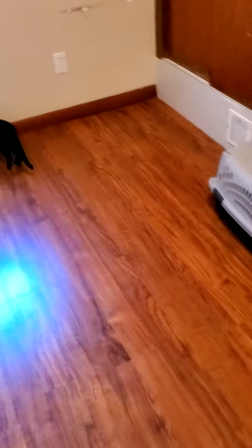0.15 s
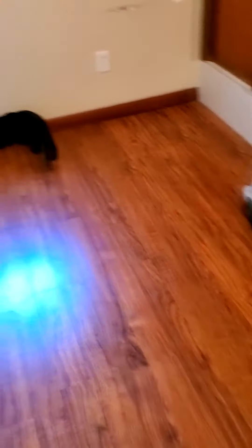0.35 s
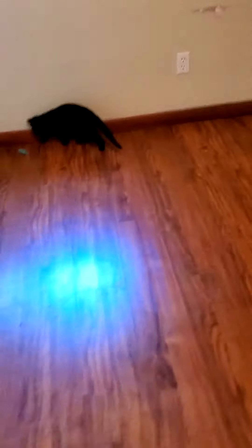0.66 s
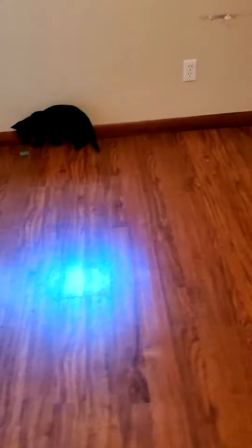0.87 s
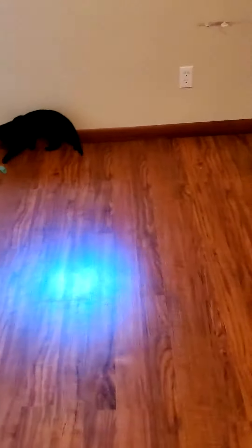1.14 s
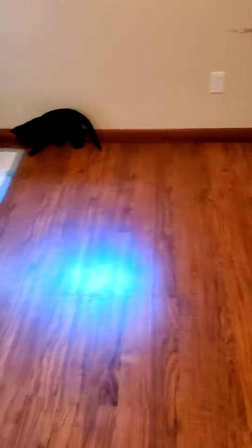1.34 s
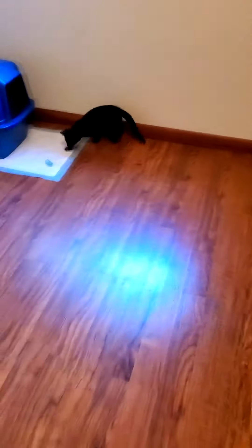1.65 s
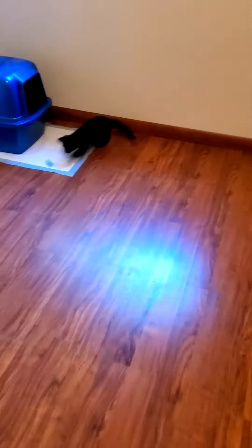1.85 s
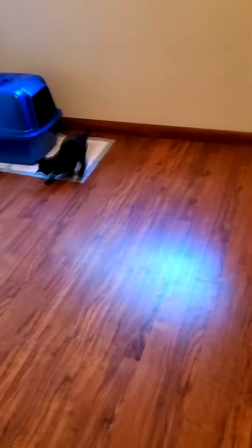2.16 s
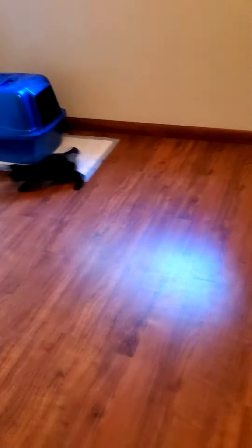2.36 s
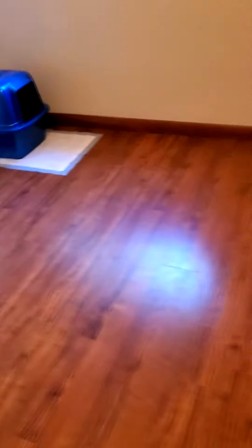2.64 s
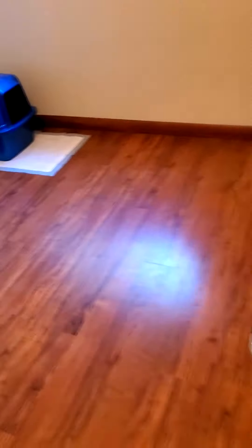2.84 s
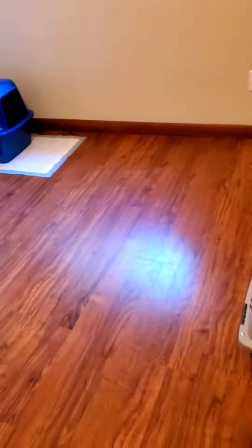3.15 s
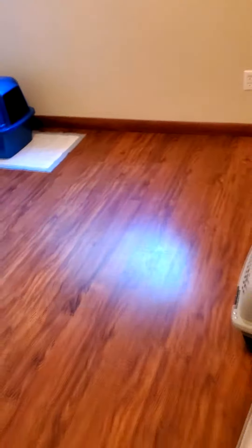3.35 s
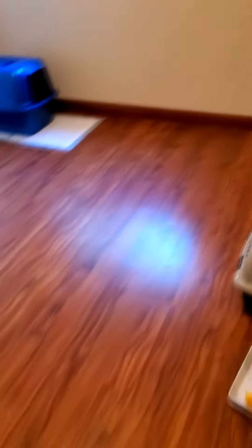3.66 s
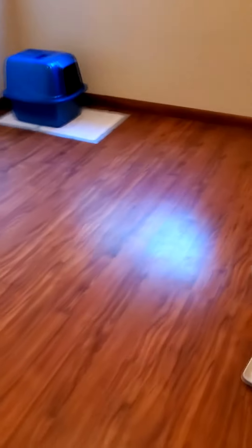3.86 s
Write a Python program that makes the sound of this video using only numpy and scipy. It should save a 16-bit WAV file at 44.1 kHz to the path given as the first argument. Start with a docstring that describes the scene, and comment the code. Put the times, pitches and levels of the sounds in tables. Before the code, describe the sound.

Toy skidding and knocking on wooden boards, with scratching claws and soft paw thuds, in an echoing room

```python
"""A bare, echoing room with a hard wooden floor: a cat chases a light toy over the boards. The toy skids and
the claws scratch (random contacts, filtered); toy and paws knock the boards (noise bursts and decaying modes,
with echo). Bright ticks, short narrow ringing bands, steady room tone and faint hum lie around them. The hand-
held camera swings round, so air buffets its two microphone ports (low noise, apart in each port)."""
import sys
import numpy as np
from scipy import signal
from scipy.fft import rfft, irfft, next_fast_len
from scipy.io import wavfile
from scipy.ndimage import uniform_filter1d, map_coordinates

SR = 44100
rng = np.random.default_rng(int(sys.argv[2]) if len(sys.argv) > 2 else 0)


def digitize_waveform(pressure):
    """Quantize a signal to 16-bit integers and store it at the path in sys.argv[1].

    Rows of a 2-D input are taken as channels; values are limited to [-1, 1].
    """
    field = np.atleast_2d(pressure).T
    bounded = np.clip(field, -1, 1)
    quanta = np.round(bounded * 32767).astype(np.int16)
    wavfile.write(sys.argv[1], SR, quanta)


def gain_from_decibels(decibels):
    """Convert decibel values to linear amplitude factors."""
    exponent = np.asarray(decibels, float) / 20
    return 10 ** exponent


N = 176400


def unit(x):
    """x at rms 1."""
    return x / np.sqrt(np.mean(x ** 2) + 1e-20)


def along(points, hz):
    """Interpolates (frequency [Hz], value) points on a log frequency axis."""
    f, v = np.transpose(points)
    return np.interp(np.log(hz + 1), np.log(f + 1), v)


def curves(rows):
    """One value per sample for each column after the time."""
    time_s, *columns = np.transpose(rows)
    return [np.interp(np.arange(N) / SR, time_s, c) for c in columns]


def wobble(knots_per_s):
    """A smooth random curve through normal-distributed knots."""
    return map_coordinates(rng.standard_normal(200), [np.arange(N) * knots_per_s / SR])


def filtered(x, response):
    """x times a response of frequency."""
    m = next_fast_len(x.shape[-1] + 4096)
    spectrum = rfft(x, m) * response(np.fft.rfftfreq(m, 1 / SR))
    return irfft(spectrum, m)[..., :x.shape[-1]]


def grains(size, per_s, spread_db):
    """Irregular contacts of uneven strength, rms 1."""
    hit = rng.random(size) < per_s / SR
    strength = rng.standard_normal(size) * gain_from_decibels(spread_db * rng.exponential(size=size))
    return unit(hit * strength)


def add(out, time_s, x):
    """Mixes x into out from time_s, cut at the end of out."""
    part = out[:, round(time_s * SR):][:, :x.shape[1]]
    part += x[:, :part.shape[1]]


# left-right likeness of the diffuse field: (frequency [Hz], correlation [0..1])
FIELD_LIKENESS = [(100, 1), (300, 0.89), (700, 0.17), (1500, 0.033), (15000, 0.033)]


def paired(pair):
    """Two unrelated signals made as alike as a diffuse field at two close ports."""
    def mid_side_gain(hz):
        turn = np.arccos(np.clip(along(FIELD_LIKENESS, hz), -1, 1)) / 2
        return np.sqrt(.5) * np.array([np.cos(turn), np.sin(turn)])

    mid, side = filtered(pair, mid_side_gain) * np.sqrt(2)
    return np.array([mid + side, mid - side])


# echo decay before each source's scaling: (frequency [Hz], t60 [s])
ROOM_DECAY = [(150, 0.99), (500, 0.85), (2000, 0.53), (5000, 0.32), (14000, 0.1)]
PORT_LAG_SAMPLES = 7  # direct sound reaches the left port later
DIRECT_DB = -5  # direct sound against the echo, for knocks and squeaks


def room(x, direct_db, decay_scale=1):
    """Direct sound plus a fresh noise tail in which each frequency dies at its own speed."""
    hz, t, z = signal.stft(rng.standard_normal((2, SR // 2)), SR, nperseg=256)
    t60_s = decay_scale * along(ROOM_DECAY, hz)
    tail = paired(signal.istft(z * gain_from_decibels(-60 * t / t60_s[:, None]), SR, nperseg=256)[1])
    tail = np.pad(tail / np.linalg.norm(tail[0]), ((0, 0), (120, 0)))
    tail[0, PORT_LAG_SAMPLES] = tail[1, 0] = gain_from_decibels(direct_db)
    return signal.fftconvolve(x[None], tail, axes=1)


def steady(wet, dry):
    """The echoed sound with the energy of the dry one in each channel, on average."""
    return wet * np.linalg.norm(dry) / np.linalg.norm(wet) * np.sqrt(2)


# room tone spectrum: (frequency [Hz], relative level [dB])
HUSH_SPECTRUM = [(59, -38), (100, -6.5), (149, 1.5), (276, -5.5), (440, -5), (510, -7), (579, -6),
                 (671, -12), (865, -14), (1560, -23), (6880, -26.5), (8500, -37.5), (15700, -33)]
HUSH_DB, DRIFT_DB, DRIFT_KNOTS_PER_S = -47, 1.2, 3.42


def hush():
    """Steady room tone: shaped diffuse noise whose level drifts a little."""
    noise = paired(rng.standard_normal((2, N)))
    tone = unit(filtered(noise, lambda hz: gain_from_decibels(along(HUSH_SPECTRUM, hz))))
    return gain_from_decibels(HUSH_DB + DRIFT_DB * wobble(DRIFT_KNOTS_PER_S)) * tone


# faint tones: (frequency [Hz], relative level [dB])
HUM_TONES = [(360.7, -61), (446.8, -58)]


def hum():
    """Sines wavering in level and phase, alike in both channels."""
    out, t = np.zeros(N), np.arange(N) / SR
    for hz, level_db in HUM_TONES:
        gain = gain_from_decibels(level_db + 1 + 4.5 * wobble(5.45))
        out += gain * np.sin(2 * np.pi * hz * t + 1.7 * wobble(12))
    return out


def port_gains(left_over_right_db):
    """Left and right gains of the given ratio, summing to 2."""
    return 2 / (1 + gain_from_decibels(np.array([-left_over_right_db, left_over_right_db])))


# air on the ports: (time [s], level [dB], left over right [dB])
AIR_LEVELS = [(0.0, -20, -15), (0.08, -36, -2), (0.15, -36, -22.5), (0.18, -30, -26), (0.23, -33.5, 13),
              (0.33, -25, 8), (0.37, -38.5, 2), (0.52, -32.5, 6), (0.56, -31.5, -16), (0.59, -25.5, 17.0),
              (0.63, -22, 20.5), (0.68, -26, 1), (0.71, -26, 10), (0.86, -26, -7), (0.91, -29, 16.5),
              (0.95, -32, 7), (1.0, -29.5, -3), (1.1, -28.5, 12), (1.14, -42, -1), (1.16, -30, 20),
              (1.21, -34.5, -3), (1.26, -36, 15), (1.3, -31, -9), (1.4, -29.5, 16), (1.45, -34.5, 5),
              (1.5, -34.5, -4), (1.61, -28, -15), (1.65, -41.5, 13), (1.78, -54, -3), (1.84, -42, 15),
              (1.87, -57, 11), (1.96, -22.5, 27), (2.02, -51, 18), (2.06, -38, 29), (2.12, -48.5, 10),
              (2.27, -44.5, 2.5), (2.34, -37.5, 24), (2.52, -43.5, 10), (2.54, -36, 2), (2.72, -63, 9),
              (2.75, -60, 15), (3.39, -42, -1), (3.85, -56.5, 6), (4.0, -53, 10)]
# turbulence spectrum: (frequency [Hz], relative level [dB])
BUFFET_SPECTRUM = [(12, -54), (20, -32), (51, 2.5), (75, 2), (134, -11.5), (307, -33.5), (331, -19),
                   (400, -56.5), (520, -72), (880, -120)]
EVEN_S = 0.0486  # window over which turbulence strength is evened
LUMPS_DB, LUMPS_PER_S = 4, 16


def buffeting():
    """Lumpy low turbulence, unrelated between the ports."""
    level_db, pan_db = curves(AIR_LEVELS)
    rush = filtered(rng.standard_normal((2, N)), lambda hz: gain_from_decibels(along(BUFFET_SPECTRUM, hz)))
    local_power = np.abs(uniform_filter1d(rush ** 2, int(EVEN_S * SR), axis=1))
    rush = rush / np.sqrt(local_power + 0.28 * np.mean(rush ** 2))
    lumps = gain_from_decibels(LUMPS_DB * np.array([wobble(LUMPS_PER_S), wobble(LUMPS_PER_S)]))
    return port_gains(pan_db) * gain_from_decibels(level_db) * unit(rush * lumps)


# sharp puffs: (time [s], level [dB], left over right [dB], frequency [Hz], width [s])
PUFFS = [(.661, -17.5, 27, 167, 0.0012), (1.217, -20, 31, 165, 0.0017), (1.946, -31.5, 16, 109, 0.0037)]


def puffs():
    """Air puffs on the ports: short cosines under a Gaussian, centred one width after their time."""
    out, t = np.zeros((2, N)), np.arange(-SR // 50, SR // 50) / SR
    for time_s, level_db, pan_db, hz, width_s in PUFFS:
        puff = -np.cos(2 * np.pi * hz * t) * np.exp(-(t / width_s) ** 2 / 2)
        add(out, time_s + t[0] + width_s, gain_from_decibels(level_db) * port_gains(pan_db)[:, None] * puff)
    return out


# short narrow ringing bands: (time [s], level [dB], frequency [Hz], length [s], half width [Hz])
RINGING_BANDS = [(4.2, -18.5, 2230, 0.0061, 180), (3.34, -42, 2500, 0.054, 54), (2.848, -28, 2170, 0.0077, 150),
                 (2.972, -23, 1200, 0.011, 147)]
RING_DECAY_SCALE = 1.1


def ringing_bands():
    """Narrow noise bands that swell and fade, ringing out of the scuffle."""
    out, t = np.zeros((2, N)), np.arange(SR // 5) / SR
    for time_s, level_db, hz, length_s, width_hz in RINGING_BANDS:
        noise = rng.standard_normal(len(t))
        band = unit(filtered(noise, lambda f: 1 / (1 + ((f - hz) / width_hz) ** 2)))
        shape = t / length_s * np.exp(1 - t / length_s)
        add(out, time_s, gain_from_decibels(level_db) * steady(room(band * shape, DIRECT_DB, RING_DECAY_SCALE), shape))
    return out


# bright ticks of the toy's shell: (time [s], relative level [dB], centre [Hz])
SHELL_TICKS = [(0.0702, -17.5, 4330), (0.3311, -13, 5360), (0.3794, -15.5, 5280), (0.4244, -18.5, 4800),
               (0.4744, -23, 5040), (1.042, -28, 3860), (2.4174, -14.5, 4180), (2.4924, -16, 12400),
               (2.5144, -13, 4360), (2.9547, -13, 2940), (2.9734, -8.5, 3900), (2.978, -16, 2920),
               (2.9834, -4, 4250), (3.3233, -35, 5200), (3.487, -19, 4300)]
TICK_DB, TICK_T60_S, TICK_OCTAVES, TICK_DIRECT_DB = -8, 0.013, 0.63, -2


def ticks():
    """A short crack of noise around its centre."""
    out, t = np.zeros((2, N)), np.arange(SR // 30) / SR
    for time_s, level_db, centre_hz in SHELL_TICKS:
        noise = rng.standard_normal(len(t))
        band = filtered(noise, lambda f: 1 / (1 + (np.log2((f + 1) / centre_hz) / TICK_OCTAVES) ** 4))
        crack = unit(band) * gain_from_decibels(-60 * t / TICK_T60_S)
        add(out, time_s, gain_from_decibels(level_db + TICK_DB) * room(crack, TICK_DIRECT_DB))
    return out


# floor resonances: (frequency [Hz], width [Hz], level [dB])
BOARD_MODES = [(224, 93, -22), (280, 20, -3), (678, 180, -18.5), (1030, 61, -5.5), (1453, 82, -29),
               (1596, 20, -2.5), (1813, 22, -7.5), (2243, 82, 0.5), (2720, 31, 6)]


def wood(f):
    """Response of the boards: resonances of alternating sign over a flat share."""
    response = 0.29
    for k, (centre_hz, width_hz, level_db) in enumerate(BOARD_MODES):
        damping = 1j * f * width_hz
        response = response + (-1) ** k * gain_from_decibels(level_db) * damping / (centre_hz ** 2 - f * f + damping)
    return response


# knocks on the boards: (time [s], relative level [dB], clatter length [s], centre [Hz])
BOARD_KNOCKS = [(.01, -39, 0.044, 800), (0.097, -44.5, 0.036, 700), (0.278, -39, 0.018, 756),
                (0.418, -40, 0.033, 596), (0.622, -36, 0.021, 450), (0.698, -37, 0.015, 650),
                (1.038, -39, 0.048, 1850), (1.175, -37, 0.026, 1210), (1.503, -41.5, 0.035, 700),
                (1.588, -32.5, 0.014, 750), (1.594, -57, .02, 1570), (1.983, -37, 0.01, 880),
                (2.199, -37, 0.028, 440), (2.233, -40, 0.074, 400), (2.457, -35, 0.02, 1480),
                (2.842, -15.5, 0.019, 2040), (2.899, -23, 0.11, 1110), (2.971, -15, 0.019, 1080),
                (3.081, -25, 0.011, 470), (3.147, -29, 0.035, 960), (3.321, -28, 0.032, 875),
                (3.505, -29.5, 0.022, 556), (3.668, -16.5, .02, 864), (3.689, -24.5, 0.017, 447),
                (3.714, -33, 0.017, 590)]
KNOCK_DB, CONTACTS_PER_S, CONTACT_SPREAD_DB = -3.5, 800, 4.9
SLOPE_DB_PER_OCTAVE = 3.5
SOFT_OCTAVES = 1.42  # a knock has little energy this far above its centre


def knocks():
    """Each knock is a short clatter of contacts, coloured by its hardness, ringing the boards."""
    out, t = np.zeros((2, N)), np.arange(SR // 4) / SR
    for time_s, level_db, length_s, centre_hz in BOARD_KNOCKS:
        def hardness(f):
            slope = gain_from_decibels(-SLOPE_DB_PER_OCTAVE * np.abs(np.log2((f + 1) / centre_hz)))
            return slope / (1 + (f / centre_hz / 2 ** SOFT_OCTAVES) ** 4)

        fade = np.exp(-t / max(length_s, .003))
        contacts = grains(len(t), CONTACTS_PER_S, CONTACT_SPREAD_DB)
        contacts[20] = 10  # the first blow
        clatter = filtered(contacts * fade, lambda f: hardness(f) * wood(f))
        add(out, time_s, gain_from_decibels(level_db + KNOCK_DB) * steady(room(clatter, DIRECT_DB), fade))
    return out


# low modes of the floor: (frequency [Hz], level [dB], t60 [s])
FLOOR_MODES = [(155, 0.5, 0.18), (231, 2, 0.11), (295, 1, 0.085), (400, -2.5, 0.081)]
# paws landing: (time [s], relative level [dB], pitch [Hz])
PAW_LANDINGS = [(2.233, -43, 167), (2.331, -39, 153), (2.46, -36.5, 164), (2.58, -30, 147),
                (2.628, -43, 178), (2.712, -26, 236), (2.759, -33, 148), (2.809, -19, 230),
                (2.921, -19, 280), (2.996, -22, 270), (3.059, -25.5, 153), (3.109, -31, 151),
                (3.186, -26, 187), (3.258, -29, 153), (3.31, -48, 161), (3.398, -33, 221),
                (3.529, -36.5, 300), (3.676, -20, 302), (3.713, -25, 257), (3.737, -30, 299),
                (3.779, -37, 275), (3.847, -31, 220)]
PAW_DB, PAW_DB_PER_OCTAVE, PAW_RISE_S = -2, 15.5, 0.0063
PAW_DIRECT_DB, PAW_DECAY_SCALE = 1.5, .35


def paws():
    """Soft thuds ring the low floor modes, most of all those nearest their pitch."""
    out, t = np.zeros((2, N)), np.arange(SR // 5) / SR
    for time_s, level_db, pitch_hz in PAW_LANDINGS:
        thud = np.zeros(len(t))
        for hz, mode_db, t60_s in FLOOR_MODES:
            off_pitch_db = PAW_DB_PER_OCTAVE * abs(np.log2(hz / pitch_hz))
            ring = np.sin(2 * np.pi * hz * rng.normal(1, 0.046) * t)
            thud += gain_from_decibels(mode_db - off_pitch_db - 60 * t / t60_s) * ring
        thud *= 1 - np.exp(-t / PAW_RISE_S)
        add(out, time_s, gain_from_decibels(level_db + PAW_DB) * steady(room(thud, PAW_DIRECT_DB, PAW_DECAY_SCALE), thud))
    return out


GRAINS_PER_S, GRAIN_SPREAD_DB = 4000, 1.8
CLUMPS_DB, CLUMPS_PER_S = 1.4, 50  # the skid catches and lets go


def scuff():
    """Dense contacts over the whole length."""
    return grains(N, GRAINS_PER_S, GRAIN_SPREAD_DB)


def clumps():
    """Gain of the catching and letting go."""
    return gain_from_decibels(CLUMPS_DB * wobble(CLUMPS_PER_S))


# claw scratch spectrum: (frequency [Hz], relative level [dB])
CLAW_SPECTRUM = [(4000, -7), (6500, -1), (8000, -0.5), (9200, 0), (11000, -1), (12500, -0.5), (15000, 0.5),
                 (16500, -3.5)]


def claw_scratch():
    """Contacts of the claws through their bright band, rms 1."""
    return unit(filtered(scuff(), lambda hz: gain_from_decibels(along(CLAW_SPECTRUM, hz))) * clumps())


# toy hiss spectrum: (frequency over skid centre [ratio], relative level [dB])
TOY_SPECTRUM = [(.2, -25), (.35, -18.5), (.5, -14), (.65, -11), (0.849, -12), (1.01, -4), (1.3, -7),
                (1.6, -3.5), (1.9, -15.5), (2.3, -16), (3, -54)]
# skids, one list each: (time [s], level before the room [dB], claws over toy [dB])
SKID_LEVELS = [
    [(0.0, -32, -5.5), (0.01, -42, 1.5), (0.062, -46.5, 3)],
    [(0.071, -36.5, -5), (0.083, -43, -2), (0.251, -45, -4.5), (0.297, -42, -1), (0.322, -47, -9)],
    [(0.331, -39.5, 4), (0.341, -45.5, 7), (0.469, -43, -5.5), (0.735, -52.5, -6), (0.929, -74.5, -8),
     (1.033, -79, 20.5)],
    [(1.041, -48.5, -2), (1.091, -44, -3), (1.333, -49, -6), (1.443, -62, 1), (1.831, -71, 6),
     (1.9, -55, -9)],
    [(1.901, -58, 3), (2.033, -47.5, -2), (2.177, -55, -2), (2.225, -55, 10), (2.305, -51.5, -8),
     (2.312, -45, 8)],
    [(2.322, -25, -3), (2.332, -39, 2), (2.394, -40.5, 5.5), (2.408, -36, 2)],
    [(2.417, -30, -6), (2.521, -41, 7.5), (2.567, -41.5, 2.5), (2.589, -38.5, 6.5), (2.689, -50, 0),
     (2.7, -32.5, -5)],
    [(2.71, -39, 7), (2.722, -38.5, -4), (2.836, -50, -3)],
    [(2.846, -31, -6.5), (2.87, -31.5, -3), (2.902, -33.5, 1.5), (2.96, -26, -7), (2.965, -24, -6)],
    [(2.973, -17, 5), (2.981, -34, 11), (3.053, -31, 1), (3.093, -30.5, -7), (3.175, -29.5, 1.5),
     (3.312, -43, -2.5)],
    [(3.32, -24, 8), (3.326, -32.5, 6), (3.47, -45.5, -0.5), (3.494, -41.5, 2.5), (3.65, -52.5, -8),
     (3.66, -39, 0)],
    [(3.669, -32.5, -1), (3.717, -35.5, 1.5), (3.781, -35, -5), (3.829, -35, -3.5), (4.0, -43, -7)],
]
# hiss centre of each skid: (frequency [Hz])
SKID_CENTRES = [4260, 3770, 4440, 3870, 4170, 4630, 4350, 4440, 3900, 3950, 4740, 3990]
SKID_DIRECT_DB, SKID_DECAY_SCALE = -10.5, 0.57
STRETCH_S = .07  # the moving toy meets a new echo pattern this often


def skids():
    """Dense contacts through the toy's hiss band, with claw scratch over them."""
    contacts = scuff() * clumps()
    claws = claw_scratch()
    ratio, colour_db = np.transpose(TOY_SPECTRUM)
    dry, out = np.zeros((1, N)), np.zeros((2, N))
    for rows, centre_hz in zip(SKID_LEVELS, SKID_CENTRES):
        level_db, scratch_db = curves(sorted(rows))
        span = slice(max(round(min(rows)[0] * SR), 0), round(max(rows)[0] * SR))
        toy = unit(filtered(contacts[span], lambda hz: gain_from_decibels(np.interp(hz / centre_hz, ratio, colour_db))))
        skid = gain_from_decibels(level_db[span]) * (toy + gain_from_decibels(scratch_db[span]) * claws[span])
        add(dry, span.start / SR, skid[None])
    step = round(STRETCH_S * SR)
    for start in range(0, N, step):
        add(out, start / SR, room(dry[0, start:start + step], SKID_DIRECT_DB, SKID_DECAY_SCALE))
    return out


# balance of the ports: (frequency [Hz], left over right [dB])
PORT_BALANCE = [(60, -3), (180, -0.5), (550, -1.5), (1650, -1.5), (4970, -1), (15000, 5)]


def scene():
    """Everything in the room through the port balance, then the air at the ports."""
    sound = skids() + knocks() + paws() + ringing_bands() + ticks() + hush() + hum()
    half = np.array([[.5], [-.5]])
    return filtered(sound, lambda hz: gain_from_decibels(half * along(PORT_BALANCE, hz))) + buffeting() + puffs()


def top_cut(x):
    """Nothing passes above the cut-off."""
    return signal.sosfilt(signal.butter(12, 16640, fs=SR, output="sos"), x)


# microphone colour: (frequency [Hz], gain [dB])
MIC_COLOUR = [(100, 0.5), (1800, 1.5), (2600, -2.5), (3300, 3.5), (4000, 2.5), (6000, -2), (8000, -4),
              (10000, -0.5), (15000, 3.5), (15900, -0.5)]
TOP_HZ = 15950


def record(dry):
    """The microphone's colour and the camera's band limit."""
    mix = filtered(dry, lambda hz: gain_from_decibels(along(MIC_COLOUR, hz)) * (hz < TOP_HZ))
    return top_cut(mix)


dry = scene()
out = record(dry)
digitize_waveform(out)
```